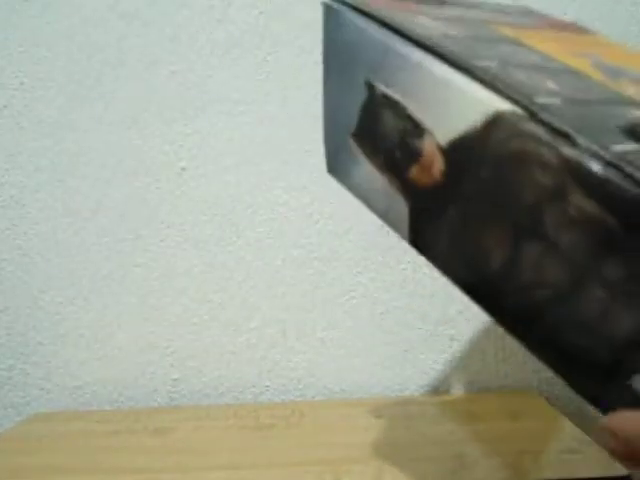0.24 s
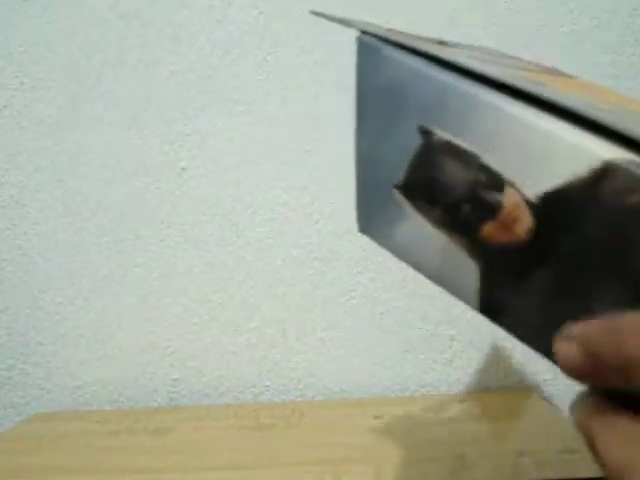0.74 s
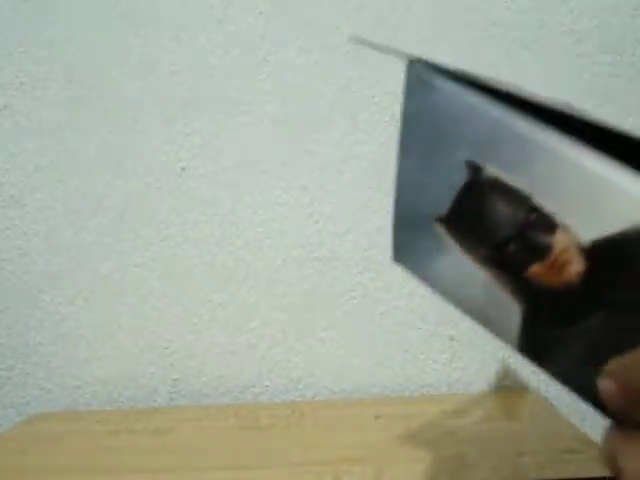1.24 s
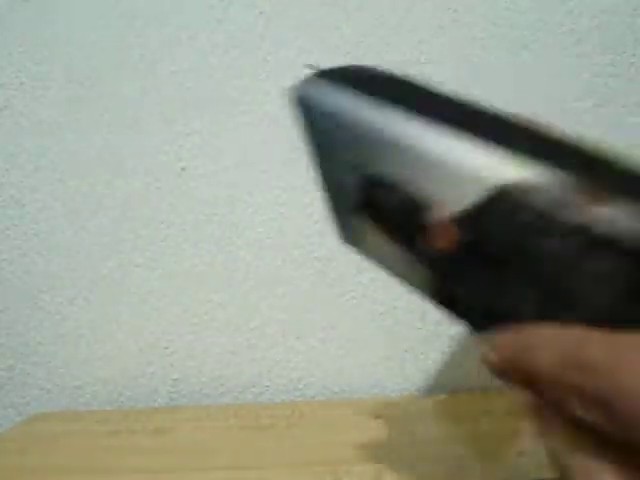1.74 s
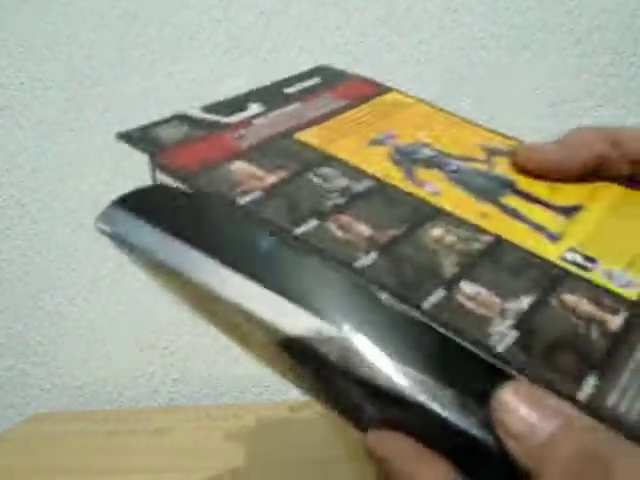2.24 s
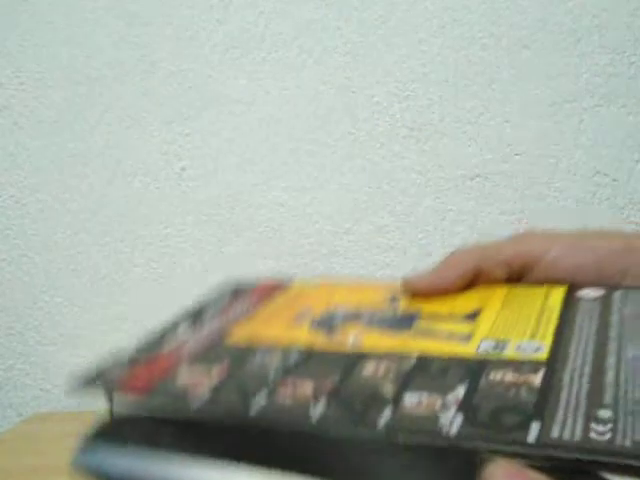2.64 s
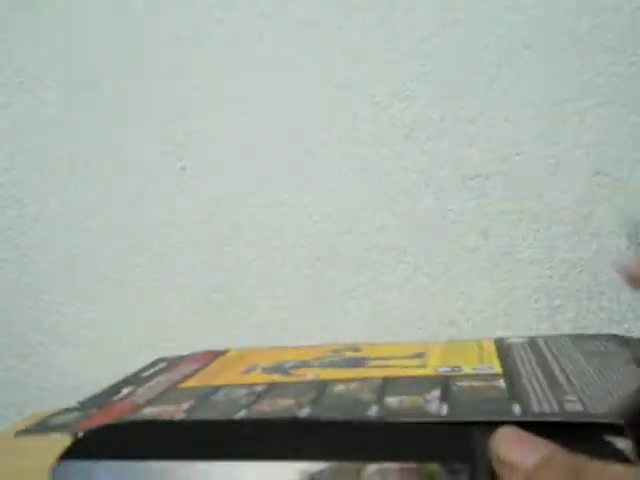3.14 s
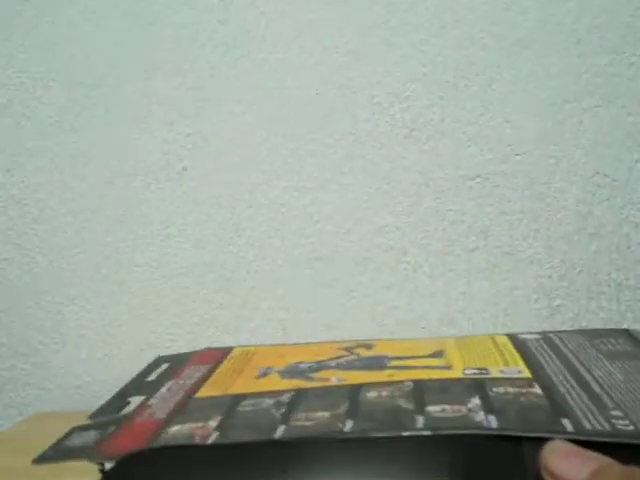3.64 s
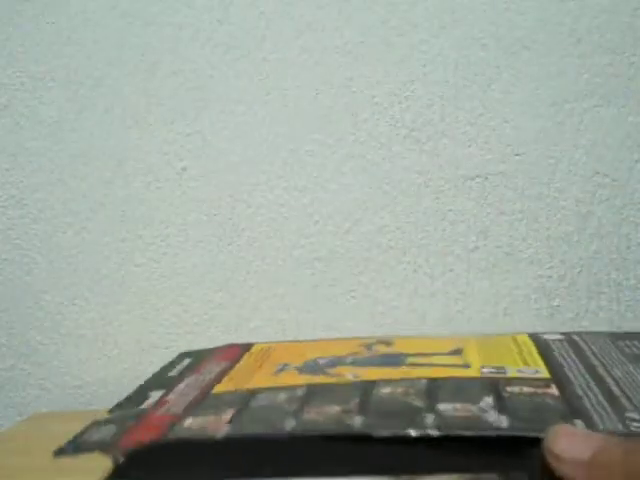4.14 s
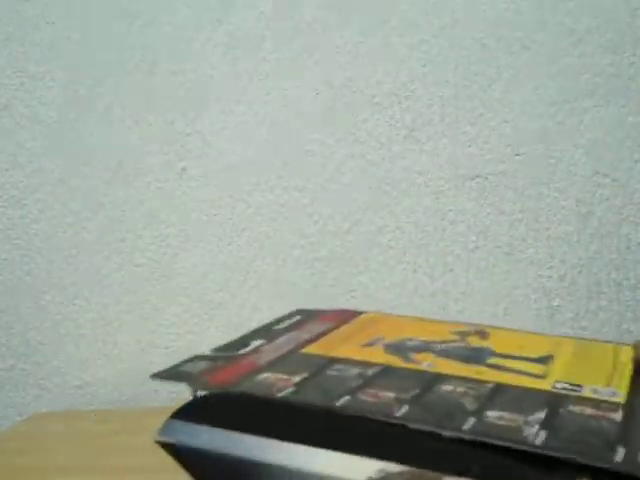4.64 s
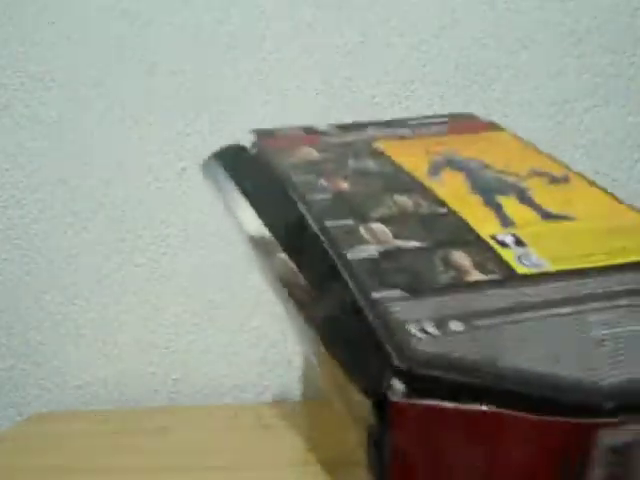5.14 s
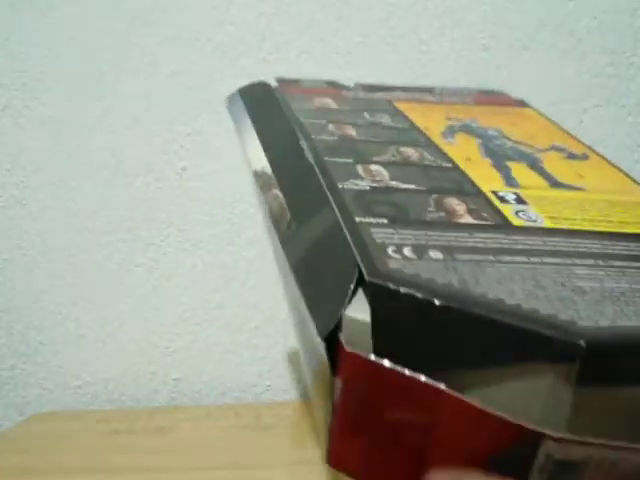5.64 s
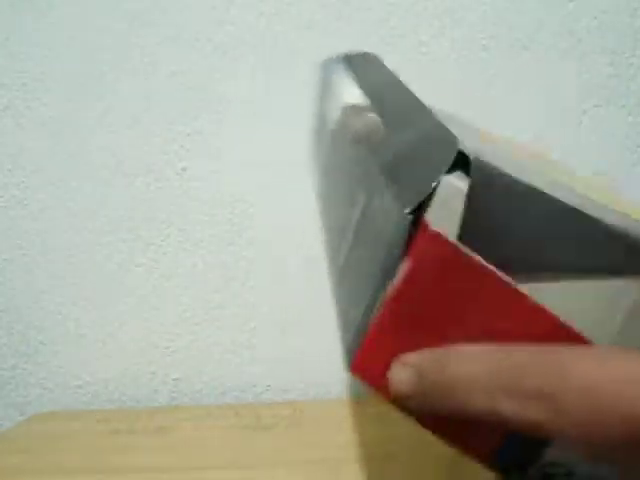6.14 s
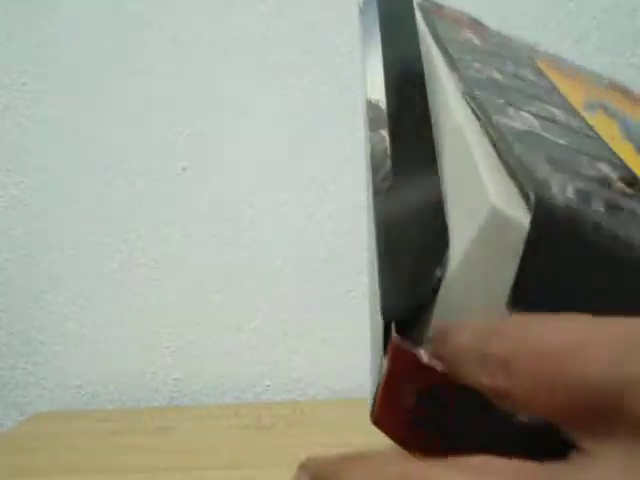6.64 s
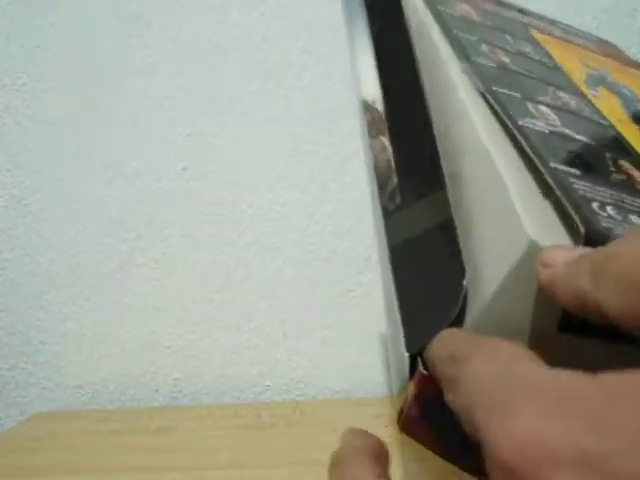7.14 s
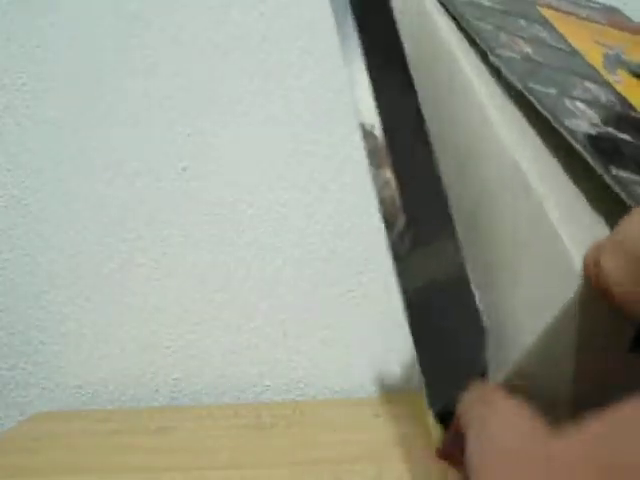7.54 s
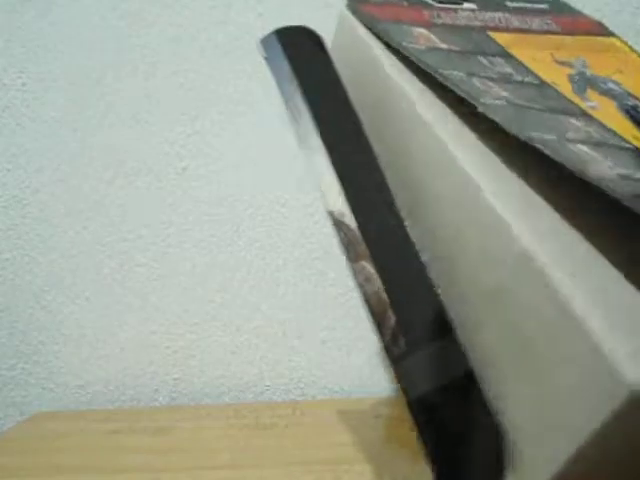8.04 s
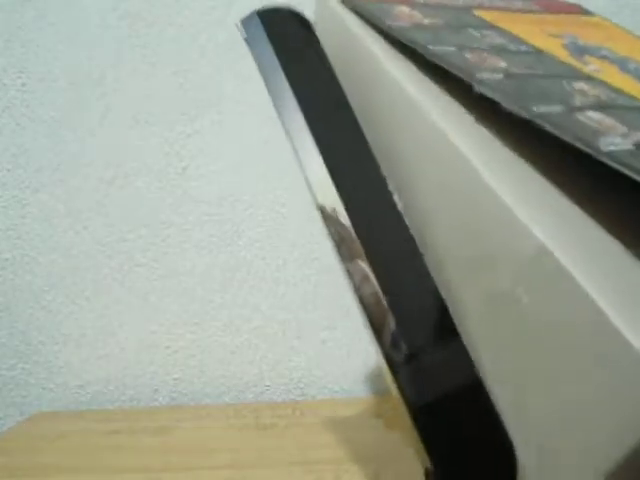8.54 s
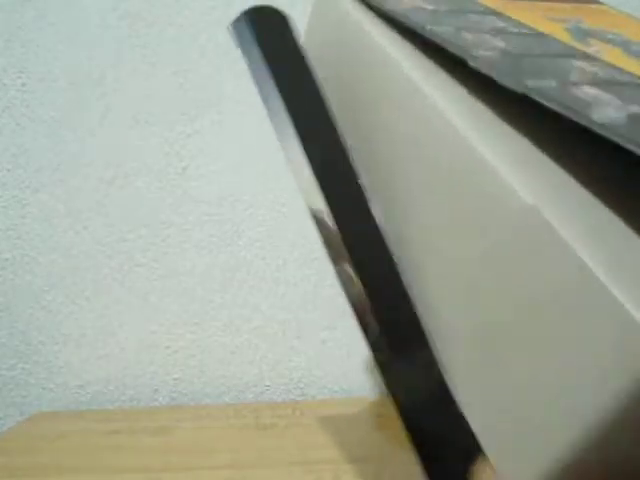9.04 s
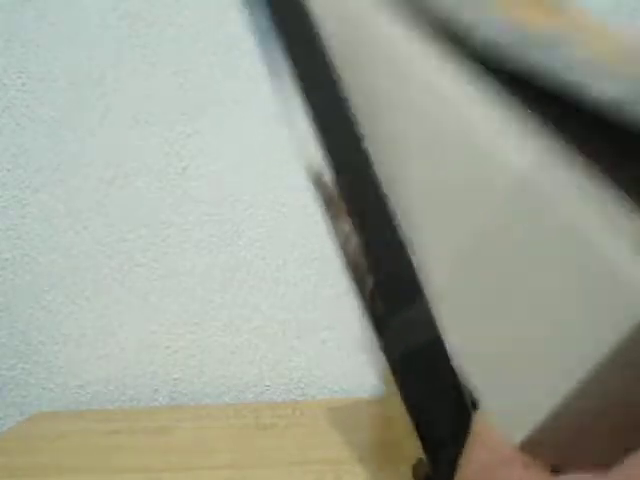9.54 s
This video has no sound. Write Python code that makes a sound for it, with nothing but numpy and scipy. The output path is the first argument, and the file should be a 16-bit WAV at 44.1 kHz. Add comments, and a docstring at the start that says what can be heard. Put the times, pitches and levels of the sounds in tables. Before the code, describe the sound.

In a small, slightly reverberant room, a stiff card box is handled close to a cheap muffled microphone. Quiet at first, then a dragged flap, snaps and a deep table thud. A violent clipped crack stands out amid shuffling. Later come clusters of thin plastic clicks, another hard snap, and short rough slides with boxy knocks, busiest at the end. Faint rumble, hum and hiss lie underneath.

```python
"""Hands turn a cardboard box over a wooden table, set it down, open a flap and slide a plastic tray out.
Knocks, snaps and ticks are short bursts of noise that ring the table, the hollow box, its stiff flap
and the thin plastic; sliding rubs the same bodies with dense tiny slips.
A low rumble, a wavering hum and a soft hiss fill the small room; the loudest snaps overload the recorder."""
import sys
import numpy as np
from scipy import signal
from scipy.fft import rfft, irfft
from scipy.io import wavfile
from scipy.ndimage import uniform_filter1d

SR = 44100
rng = np.random.default_rng(int(sys.argv[2]) if len(sys.argv) > 2 else 0)


def transcribe(signal):
    """Save signal, clipped to [-1, 1], as a 16-bit WAV file at the path in sys.argv[1]."""
    frames = np.atleast_2d(signal).T
    limited = np.clip(frames, -1, 1)
    pcm = np.round(limited * 32767).astype(np.int16)
    wavfile.write(sys.argv[1], SR, pcm)


def boost_factor(decibels):
    """Convert a level in decibels to a linear amplitude factor."""
    exponent = np.asarray(decibels, float) / 20
    return 10 ** exponent


N = 432180


def unit(x):
    """Scale to rms 1."""
    return x / np.sqrt(np.mean(x ** 2))


def walk(rate_hz):
    """A random level that drifts smoothly, with rms 1: held values, smoothed twice."""
    hold = int(SR / rate_hz)
    steps = np.repeat(rng.standard_normal(N // hold + 1), hold)
    smooth = uniform_filter1d(uniform_filter1d(steps, hold), hold)
    return unit(smooth[:N])


def noise_band(centre_hz, width_hz):
    """Noise gathered around one frequency, falling off smoothly on both sides, with rms 1."""
    f = np.maximum(np.fft.rfftfreq(N, 1 / SR), 1)
    spectrum = rfft(rng.standard_normal(N)) / (1 + ((f - centre_hz) / width_hz) ** 2)
    return unit(irfft(spectrum, N))


# The colour of the soft hiss. Each row: frequency in Hz, relative level in dB per Hz.
HISS_COLOUR = [(30, -9), (55, -5.5), (90, -3.5), (118, -7.5), (318, -12.5), (508, -17.5), (1490, -27),
               (2190, -30.5), (5000, -35)]
HISS_DB = -46.5


def hiss():
    """Steady noise with a smooth spectrum that is strongest in the bass."""
    f = np.maximum(np.fft.rfftfreq(N, 1 / SR), 1)
    hz, db = np.transpose(HISS_COLOUR)
    colour = boost_factor(np.interp(np.log(f), np.log(hz), db))
    return boost_factor(HISS_DB) * unit(irfft(rfft(rng.standard_normal(N)) * colour, N))


def rumble():
    """Very deep noise whose level heaves up and down."""
    level_db = -34.5 + 2.5 * walk(5.4)
    return boost_factor(level_db) * noise_band(centre_hz=17.8, width_hz=6)


# A low hum, perhaps a far motor. Each row: time in seconds, pitch in Hz, level in dB.
HUM_PATH = [(0.0, 68.3, -35), (0.63, 72.8, -48), (1.63, 61.17, -44), (1.88, 67.08, -39), (2.59, 72.3, -48),
            (3.52, 52.28, -43.5), (4.15, 68.58, -42.5), (6.25, 69, -44), (7.75, 58.2, -40.5),
            (8.65, 67.36, -48), (8.76, 61.2, -41), (9.14, 58.6, -39), (9.39, 67.1, -44.5), (9.8, 65.6, -43)]
HUM_WIDTH_HZ = 2.5


def hum():
    """A gliding low tone; slow noise on its sine and cosine parts makes it waver."""
    s, hz, db = np.transpose(HUM_PATH)
    t = np.arange(N) / SR
    phase = 2 * np.pi * np.cumsum(np.interp(t, s, hz)) / SR
    in_step = (0.8 + noise_band(0, HUM_WIDTH_HZ)) * np.sin(phase)
    across = noise_band(0, HUM_WIDTH_HZ) * np.cos(phase)
    return boost_factor(np.interp(t, s, db)) * unit(in_step + across)


# How the four bodies ring: the wooden table, the hollow box, its stiff flap, the thin plastic.
# Each row: frequency in Hz, relative level in dB, time in seconds to fall 60 dB before extra damping.
TABLE_MODES = [(111.5, -2.5, 0.15), (140.6, -3, 0.39), (190.7, 0.5, 0.054), (236.9, -5.5, 0.32),
               (287.5, -1.5, 0.15), (355.5, -2, 0.18)]
BOX_MODES = [(423, -1, 0.04), (502.4, 3, 0.052), (617, 2, 0.049), (669, 1, 0.046), (890, 0, 0.016),
             (929, -3, 0.066), (1091, -13, 0.02)]
FLAP_MODES = [(1355, 6, 0.024), (1391, 0, 0.3), (1697, 10, 0.0099), (2067, -2, 0.027), (2070, 5.5, 0.018)]
PLASTIC_MODES = [(2387, 4.1, 0.0036), (2930, 2.94, 0.018), (3370, 7.04, 0.0036), (4006, 3.2, 0.015),
                 (4680, 7.6, 0.0039), (4990, 2.8, 0.0099), (5955, 6.95, 0.0055)]
# How firmly the hands hold the card: the flap hangs free while it is dragged, firmer once it is open.
# Each row: time in seconds, grip from 0 (loose) to 1 (firm).
HAND_GRIP = [(0, 0.6), (1.38, 0.54), (1.43, .05), (1.6, .05), (1.64, 0.7), (4.7, 0.62), (5.3, 0.79),
             (9.8, 0.36)]
# The extra damping lets a ring fall to about a third in this many cycles; nobody holds the table.
LOOSE_CYCLES, FIRM_CYCLES, TABLE_CYCLES = 24, 3.5, 16


def ring(body, s, scatter_db):
    """Ringing of one body at time s: decaying sines, damped by the grip and varied by the contact point."""
    grip = np.interp(s, *np.transpose(HAND_GRIP))
    cycles = LOOSE_CYCLES * (FIRM_CYCLES / LOOSE_CYCLES) ** grip
    if body is TABLE_MODES:
        cycles = TABLE_CYCLES
    hz, db, t60 = np.transpose(body)[:, :, None]
    length_s = 0.7 * np.minimum(t60, 6 * cycles / hz).max()
    t = np.arange(int(length_s * SR)) / SR
    level_chance, pitch_chance = rng.standard_normal((2, len(body), 1))
    # neighbouring modes swing in opposite directions
    sign = (-1) ** np.arange(len(body))[:, None]
    decay = np.exp(-np.log(1000) * t / t60 - t * hz / cycles)
    level = sign * boost_factor(db + scatter_db * level_chance)
    tone = np.sin(2 * np.pi * hz * (1 + 0.036 * pitch_chance) * t)
    return np.sum(level * decay * tone, axis=0)


def tiny_slips():
    """Sparse clicks of very uneven size, coming in gusts, over a bed of plain noise."""
    count = N + SR
    size = boost_factor(2.3 * np.minimum(rng.exponential(size=count), 5))
    slips = (rng.random(count) < 0.03) * size * rng.standard_normal(count)
    gusts = np.pad(boost_factor(3.18 * walk(60)), (0, SR), mode="edge")
    return unit(unit(slips) * gusts + 0.76 * rng.standard_normal(count))


TABLE_RUB_DB = -6.5  # rubbing shakes the table this much less than the box
FLAP_RUB_DB = -4  # the flap, under the mean of box and plastic


def rub(slips, rows):
    """Slips ring all four bodies; every rub finds another spot and so another colour.
    Each row: start in seconds, length in ms, flap modes, levels in dB of box, flap and plastic."""
    out = np.zeros(N + 2 * SR)
    for start, ms, flap, box_db, flap_db, plastic_db in rows:
        # the swell lasts half as long again as the given length and begins a little early
        swell_samples = ms / 1000 * SR * 1.5
        u = np.arange(int(swell_samples)) / swell_samples
        i = max(int(start * SR - len(u) / 10), 0)
        # pressure peaks early and lets go more slowly
        pressure = np.sin(np.pi * u ** 0.77) ** 1.2
        drive = slips[i:i + len(u)] * pressure
        bodies = ((TABLE_MODES, box_db + TABLE_RUB_DB), (BOX_MODES, box_db),
                  (flap, flap_db), (PLASTIC_MODES, plastic_db))
        together = np.zeros(SR // 2)
        for body, db in bodies:
            response = ring(body, start, scatter_db=2.2)
            together[:len(response)] += response * boost_factor(db) / np.linalg.norm(response)
        sound = signal.fftconvolve(drive, np.trim_zeros(together, "b"))
        out[i:i + len(sound)] += sound
    return out[:N]


def rub_along(slips, strokes):
    """Rub the box; the brightness lifts the plastic fully and the stiff flap by half."""
    rows = [(start, ms, FLAP_MODES, db, db + bright_db / 2 + FLAP_RUB_DB, db + bright_db)
            for start, ms, db, bright_db in strokes]
    return rub(slips, rows)


# Light fumbling between strokes.
# Each row: time in seconds, level on the box in dB, brightness in dB of the plastic over the box.
FUMBLE_PATH = [(0.0, -74, 7), (0.5, -66.5, -1.5), (1.4, -54.5, -5.5), (2.0, -60, -5.5), (2.9, -53, -3),
               (3.45, -66.5, -5.5), (4.4, -59, -6), (4.9, -81, -14.5), (5.4, -60, -13), (5.9, -47.5, -8),
               (6.4, -54.5, -1), (6.85, -54, -5), (7.35, -57.5, -21.5), (7.85, -46.5, -12.5),
               (8.4, -50, -16), (9.3, -41, -11), (9.8, -36, -11.5)]


def fumble_levels(s):
    """Level on the box and brightness of the fumbling at times s, both in dB."""
    when, db, bright_db = np.transpose(FUMBLE_PATH)
    return np.interp(s, when, db), np.interp(s, when, bright_db)


def fumbling(slips):
    """A chain of overlapping soft rubs, slightly uneven in level."""
    starts = np.arange(0, N / SR, 0.12)
    db, bright_db = fumble_levels(starts)
    uneven_db = 2 * rng.standard_normal(len(starts))
    lengths_ms = np.full(len(starts), 150)
    return rub_along(slips, zip(starts, lengths_ms, db + uneven_db, bright_db))


# Hands and tray rub along the box. Each row: start in seconds, length in ms before the swell is stretched,
# level on the box in dB, brightness in dB of the plastic over the box.
BOX_STROKES = [(0.114, 40, -57, 9), (0.18, 54, -63, 9.5), (0.417, 110, -52.5, -2.5), (0.609, 78, -64, 3),
               (1.0, 114, -55.5, 5), (1.262, 32, -50.5, 4), (1.302, 56, -38, 1.5), (1.734, 53, -53.5, 6.5),
               (2.228, 48, -40.5, -8.5), (2.368, 39, -39.5, 0), (2.463, 81, -43.5, 6),
               (2.799, 106, -40, -13), (3.04, 87, -44, -18), (3.552, 42, -48.5, -3.5),
               (3.632, 68, -46, -9.5), (3.89, 72, -47, -13), (4.125, 112, -38, -11.5),
               (4.198, 70, -37, -15.5), (4.289, 62, -45.5, -7), (4.413, 73, -49.5, 1.5),
               (4.554, 53, -48.5, -2), (4.609, 100, -46.5, 3), (4.71, 66, -50, -3.5),
               (4.793, 103, -47, -11), (5.336, 20, -46, 2.5), (5.366, 56, -33, -1.5),
               (5.442, 144, -50.5, 5.5), (5.605, 81, -41, -8.5), (5.748, 35, -46.5, 10.5),
               (5.788, 71, -38.5, -12), (5.871, 73, -41.5, 2.5), (6.032, 63, -45.5, 9),
               (6.279, 65, -54, 14.5), (6.372, 44, -47, 6.5), (6.433, 86, -40.5, 2.5),
               (6.575, 71, -45, 0.5), (6.713, 61, -43, 0.5), (6.788, 92, -54.5, 11), (7.088, 96, -57.5, -2),
               (7.29, 106, -62.5, 3), (7.5, 56, -42.5, -6.5), (7.587, 100, -44, -4.5),
               (7.741, 104, -37, -7), (7.871, 80, -39.5, -12), (7.972, 75, -27, -14),
               (8.049, 49, -36.5, -19), (8.132, 52, -43.5, -7.5), (8.191, 77, -35, -2.5),
               (8.374, 78, -45.5, -12), (8.541, 92, -42, -20), (8.673, 40, -41, -5), (8.745, 89, -39, -7),
               (8.999, 49, -43.5, -6), (9.022, 78, -22, -11), (9.211, 64, -33.5, 0.5), (9.305, 62, -37, 4),
               (9.391, 88, -37.5, -9.5), (9.501, 41, -35.5, -28), (9.554, 82, -30, -11.5),
               (9.64, 270, -47, -16)]


def strokes(slips):
    """Shorter, stronger rubs of hands and tray, each with its own brightness."""
    return rub_along(slips, BOX_STROKES)


# How the flap rings when its edge is let go.
# Each row: frequency in Hz, relative level in dB, time in seconds to fall 60 dB before extra damping.
FREE_FLAP_MODES = [(1480, -4, .03), (1640, 0, .04), (1790, -2, .03), (1980, -6, .03)]
# The free edge of the flap drags and squeaks.
# Each row: start in seconds, length in ms before the swell is stretched, level on the flap in dB.
FLAP_DRAGS = [(1.44, 76, -27), (1.568, 58, -38.5), (1.86, 71, -49), (1.969, 51, -49), (3.765, 57, -34.5),
              (4.28, 60, -51)]


def drags(slips):
    """Rubbing that mostly rings the free flap, with the box 19 dB and the plastic 13 dB under it."""
    return rub(slips, [(start, ms, FREE_FLAP_MODES, db - 19, db, db - 13) for start, ms, db in FLAP_DRAGS])


def strike(rows, share_db, hit):
    """A chatter of noise with a faint crunch before and after rings all four bodies.
    Each row: start in seconds, level in dB, brightness in dB per body, chatter in ms; hit: body number."""
    out, lead = np.zeros(N + SR), SR // 100
    t = np.arange(-lead, SR // 14) / SR
    after = np.maximum(t, 0)
    bodies = (TABLE_MODES, BOX_MODES, FLAP_MODES, PLASTIC_MODES)
    for s, level_db, bright_db, chatter_ms in rows:
        blow = np.exp(-after / (chatter_ms / 1000)) * (1 - np.exp(-after / 0.0004))
        crunch = boost_factor(-22) * np.exp(np.minimum(t, 0) / 0.0013 - after / 0.023)
        chatter = rng.standard_normal(len(t)) * (blow + crunch)
        i = int(s * SR) - lead
        # a brighter blow tips the share towards the thin bodies, turning about the body that is hit
        peaks_db = level_db + np.array(share_db) + bright_db * (np.arange(4) - hit)
        for body, peak_db in zip(bodies, peaks_db):
            sound = signal.fftconvolve(chatter, ring(body, s, scatter_db=4.0))
            out[i:i + len(sound)] += sound * boost_factor(peak_db) / np.abs(sound).max()
    return out[:N]


# The thin plastic ticks. Each row: start in seconds, level in dB before sharing, brightness in dB per body.
PLASTIC_TICKS = [(0.365, -40.5, 0), (0.76, -40, -6), (1.114, -29, -5), (1.984, -40, -8.5), (2.02, -39, -5),
                 (3.371, -29, -3), (3.901, -36, -3), (4.573, -30, -6), (5.145, -30, 0), (5.446, -22, 3),
                 (5.472, -21.5, 8), (5.493, -22, 4), (5.513, -23.5, 0), (5.628, -21.5, -1.5),
                 (5.651, -25, 5), (5.678, -22.5, 4), (5.7, -30.5, 0), (5.888, -16.5, 1.5), (6.217, -32, -6),
                 (6.379, -18.5, -0.5), (6.458, -25, -2.5), (6.604, -35, -6), (6.878, -25, 1),
                 (7.125, -39, -3), (7.164, -38.5, -7), (7.518, -33.5, -3.5), (7.575, -32.5, 2),
                 (7.62, -32, 5), (7.675, -20.5, -0.5), (7.751, -31.5, 0), (8.35, -39, 0), (8.455, -26, -2),
                 (9.551, -12.5, 0), (9.634, -26, -4)]
# How a tick shares out: dB of table, hollow box, flap, plastic.
TICK_SHARE_DB = (-17.5, -15.5, -12, -0.5)
CRACKLES_PER_S, CRACKLE_DB, CRACKLE_SPREAD_DB = 7, 16.5, 3


def ticks():
    """Planned ticks of the plastic, plus random crackles that follow the level of the fumbling on it."""
    count = int(CRACKLES_PER_S * N / SR)
    when = 0.02 + rng.random(count) * (N / SR - 0.1)
    db, bright_db = fumble_levels(when)
    level_db = db + bright_db + CRACKLE_DB + CRACKLE_SPREAD_DB * rng.exponential(size=count)
    crackles = np.transpose([when, level_db, -6 * rng.random(count)])
    rows = [(*row, 2.7) for row in PLASTIC_TICKS + list(crackles)]  # 2.7 ms of chatter
    return strike(rows, TICK_SHARE_DB, hit=3)


# The stiff flap snaps.
# Each row: start in seconds, level in dB before sharing, brightness in dB per body, chatter in ms.
FLAP_SNAPS = [(0.882, -33, -3, 6.6), (1.342, -18, -2, 3), (2.243, -27.5, 1, 6.5), (2.352, -30, 0, 8),
              (2.374, -24, 2, 8.7), (2.39, -18.5, 0, 6.7), (2.467, -25, 0, 2.6), (2.498, -24, 4, 4.6),
              (3.757, 2.2, -1, 2.1), (4.801, -25, -3, 1.7), (5.394, -16, 5, 1.8), (5.7791, -2.5, 5, 1.2)]
# How a snap shares out: dB of table, hollow box, flap, plastic.
SNAP_SHARE_DB = (-17, -15.5, -1, -5.5)


def snaps():
    """Blows that ring the flap most; their level ranges from faint to overloading."""
    return strike(FLAP_SNAPS, SNAP_SHARE_DB, hit=2)


# The box lands on the table.
# Each row: start in seconds, level in dB before sharing, brightness in dB per body, chatter in ms.
TABLE_THUDS = [(1.089, -29.5, 0, 3), (1.595, -27.5, -4, 1.1), (2.773, -8, -1, 4.5), (3.015, -16, 4.5, 11.3),
               (3.099, -27, 4, 5.4), (3.151, -26.5, 0, 1.3), (3.7607, -17, 3, 1.5), (3.772, -20, 3.5, 4.2),
               (4.117, -24, 6, 3.2), (4.182, -7.5, 1.5, 7.3), (4.327, -31.5, 6.5, 7.9),
               (4.636, -22.5, 3, 2.5), (4.86, -28.5, 1.5, 4.7), (8.396, -29, 6, 5.1)]
# How a thud shares out: dB of table, hollow box, flap, plastic.
THUD_SHARE_DB = (0, -8, -14.5, -17.5)


def thuds():
    """Blows that ring the low modes of the table most."""
    return strike(TABLE_THUDS, THUD_SHARE_DB, hit=0)


# Fingers and tray knock the hollow box.
# Each row: start in seconds, level in dB before sharing, brightness in dB per body, chatter in ms.
BOX_KNOCKS = [(1.3, -15.5, -1.5, 1.9), (2.775, -12.5, -6.5, 5.7), (3.017, -18.5, -4.5, 6.9),
              (1.646, -9.5, 1.5, 4.2), (1.717, -20.5, 1, 4.9), (5.363, -26, -0.5, 6.2),
              (6.701, -21.5, 1.5, 1.6), (6.713, -23, 2, 3), (6.851, -25, 0, 1.3), (7.787, -25.5, 1, 5.6),
              (7.972, -15.5, 3, 4.8), (7.997, -14, 2, 2.9), (8.028, -17, 2.5, 1.1), (8.156, -24, -5, 3.6),
              (8.204, -23.5, 1, 2.2), (8.705, -19.5, 1, 2.5), (8.905, -23.5, 0.5, 1.2),
              (8.995, -26.5, 1, 1.8), (9.034, -9, 1.5, 3.1), (9.061, -13.5, -0.5, 1.2),
              (9.079, -8, -2, 1.5), (9.103, -30, -3, 1.5), (9.337, -14, 3.5, 2.8), (9.425, -31, 1.5, 2.2),
              (9.548, -12, 2.5, 3.5)]
# How a knock shares out: dB of table, hollow box, flap, plastic.
KNOCK_SHARE_DB = (-7.5, 0, -5, -5.5)


def knocks():
    """Blows that ring the hollow box most."""
    return strike(BOX_KNOCKS, KNOCK_SHARE_DB, hit=1)


def walls(near):
    """A short diffuse answer from the room: noise that falls 60 dB in 0.17 s, after a 6 ms gap."""
    t = np.arange(SR // 2) / SR
    tail = rng.standard_normal(len(t)) * np.exp(-np.log(1000) * t / 0.17) * (t > 0.006)
    return boost_factor(-13) * signal.fftconvolve(near, tail / np.linalg.norm(tail))[:N]


def scene():
    """Hands at arm's length, the answer of the walls and the background of the room."""
    background = hiss() + rumble() + hum()
    slips = tiny_slips()  # all rubbing shares the same slips
    sliding = fumbling(slips) + strokes(slips) + drags(slips)
    near = sliding + ticks() + snaps() + thuds() + knocks()
    return (near + walls(near) + background)[None]


def band_limit(x):
    """A steep low-pass at the top of the band."""
    return signal.sosfilt(signal.butter(12, 16500, fs=SR, output="sos"), x)


def record(dry):
    """A narrow-band recorder: a step down in the treble, then a steep cut; the highest peaks are clipped flat."""
    f = np.fft.rfftfreq(N, 1 / SR)
    step_db = -19 / (1 + np.exp((5345 - f) / 70))
    cut_db = -90 / (1 + np.exp(np.minimum((6274 - f) / 110, 50)))
    narrow = irfft(rfft(dry) * boost_factor(step_db + cut_db), N)
    clipped = np.clip(narrow, -0.72, 0.72)
    return band_limit(clipped)


dry = scene()
out = record(dry)
transcribe(out)
```